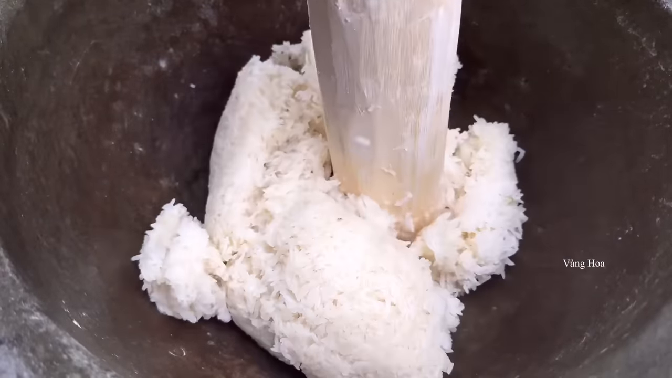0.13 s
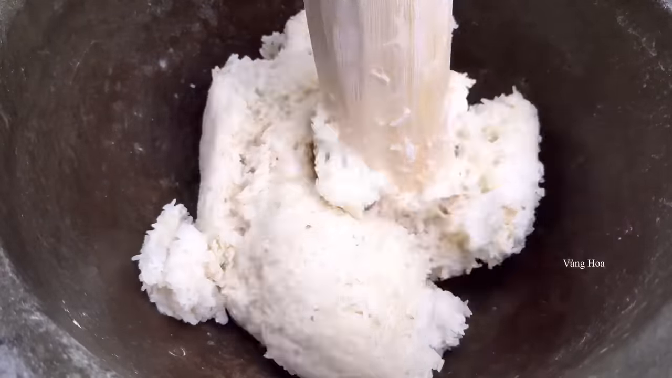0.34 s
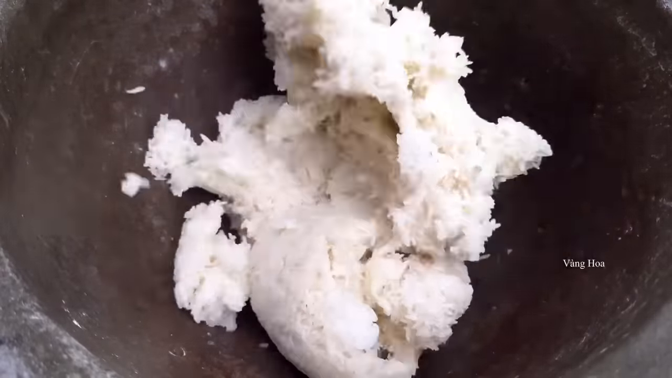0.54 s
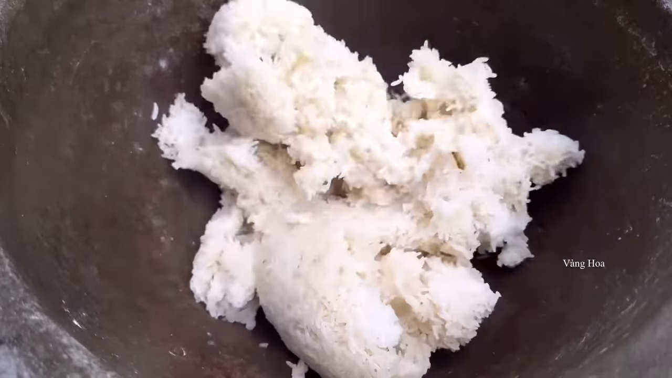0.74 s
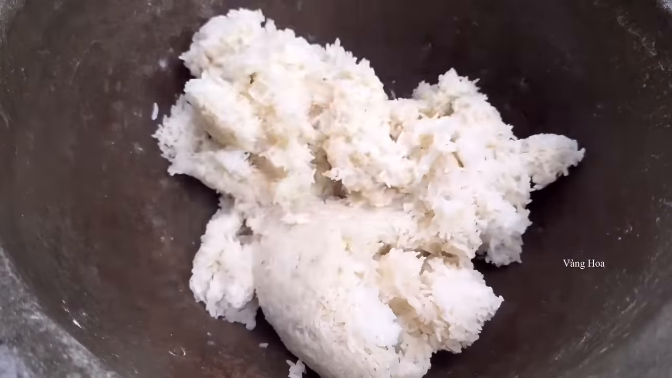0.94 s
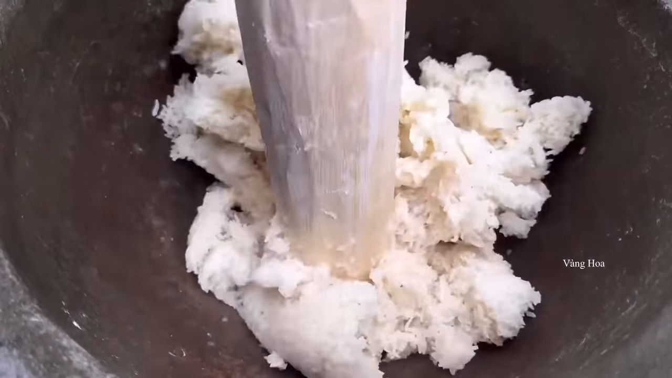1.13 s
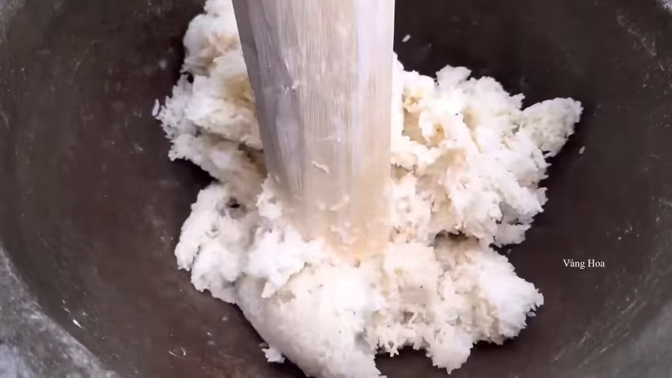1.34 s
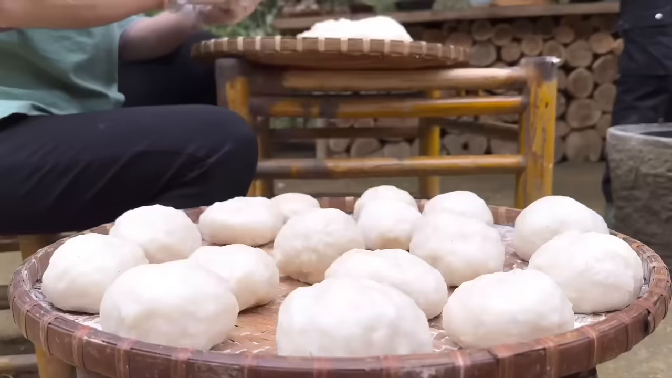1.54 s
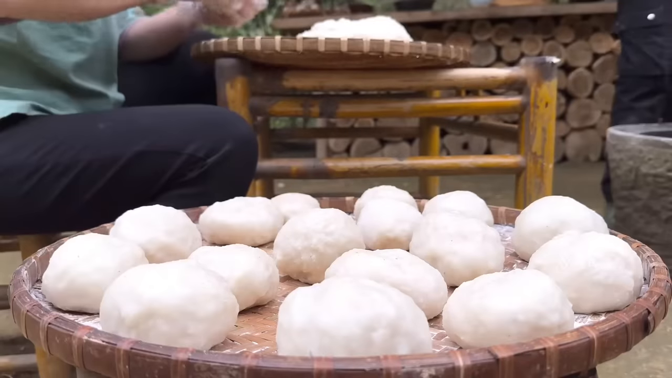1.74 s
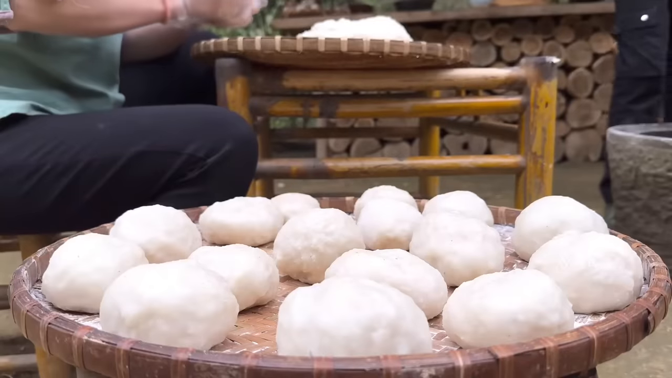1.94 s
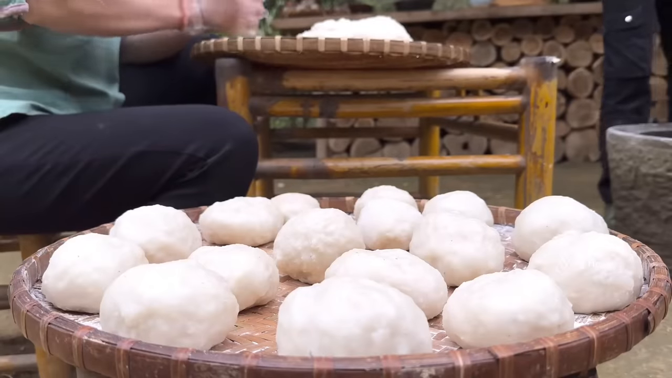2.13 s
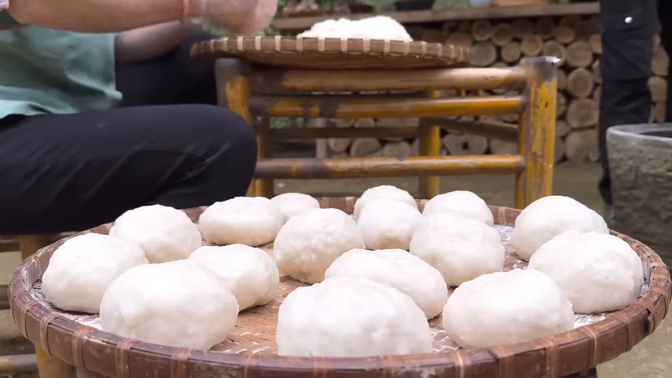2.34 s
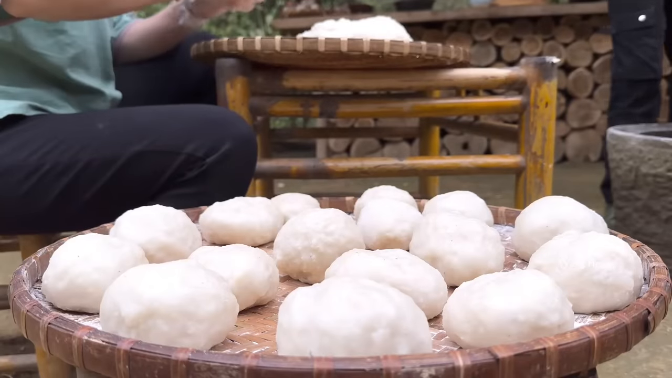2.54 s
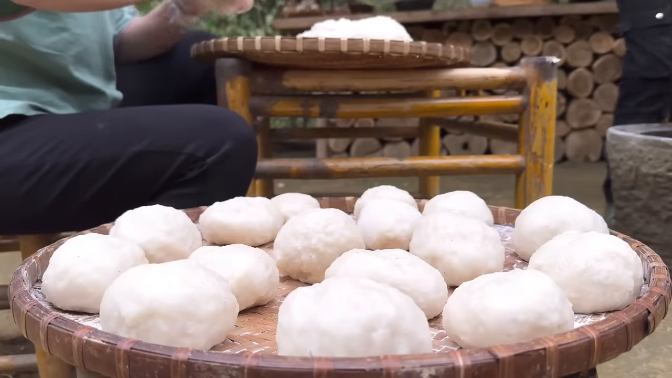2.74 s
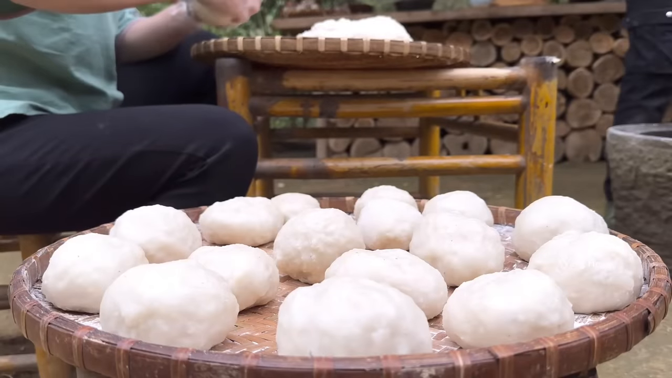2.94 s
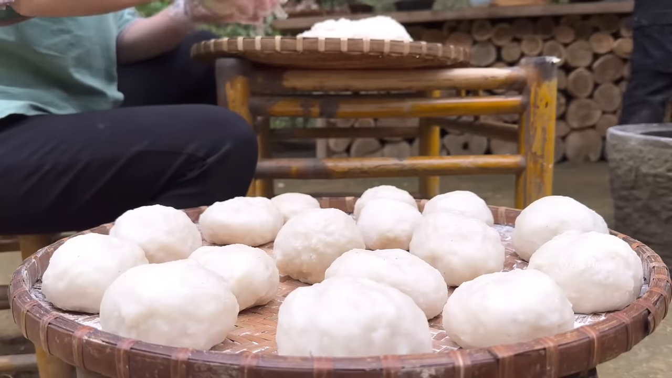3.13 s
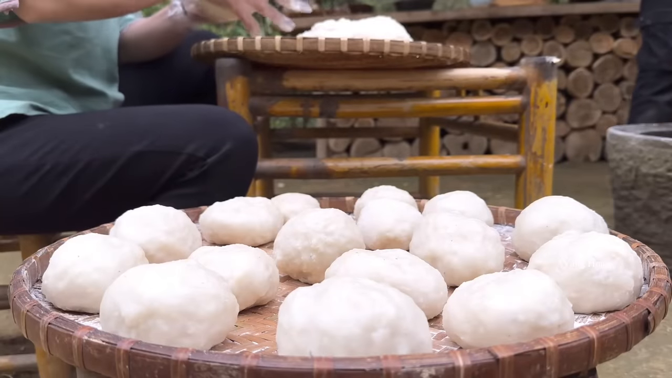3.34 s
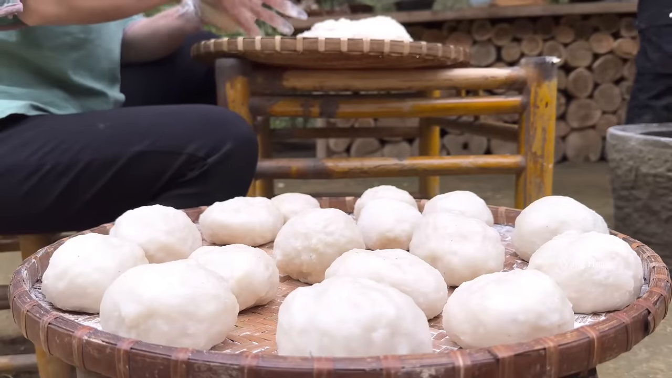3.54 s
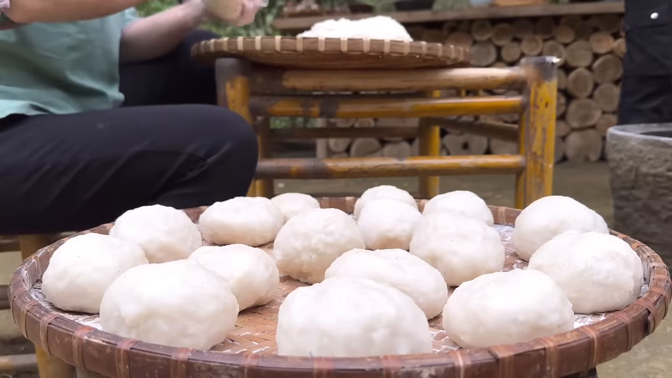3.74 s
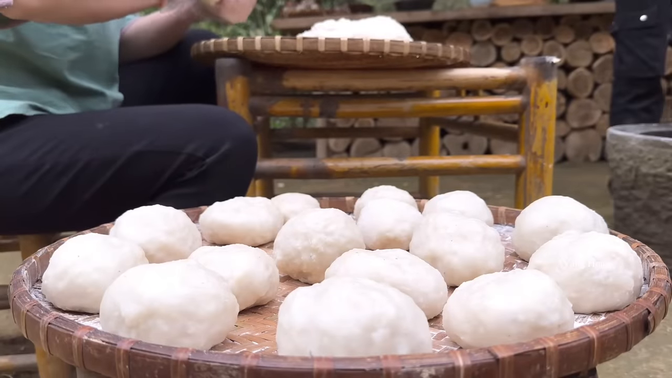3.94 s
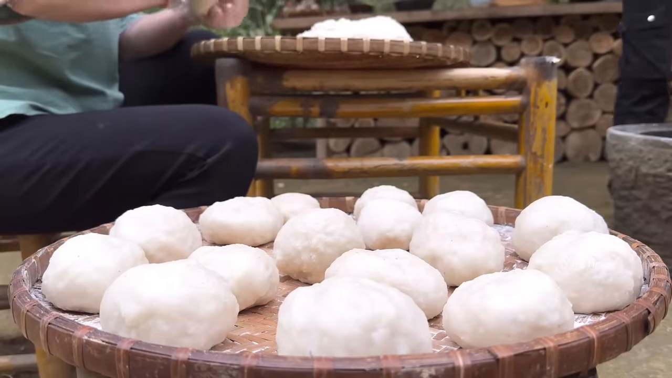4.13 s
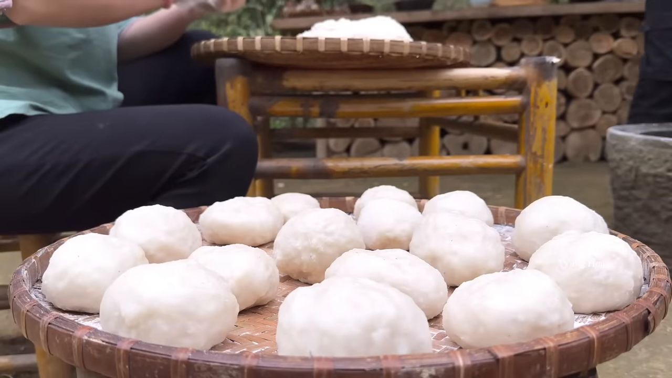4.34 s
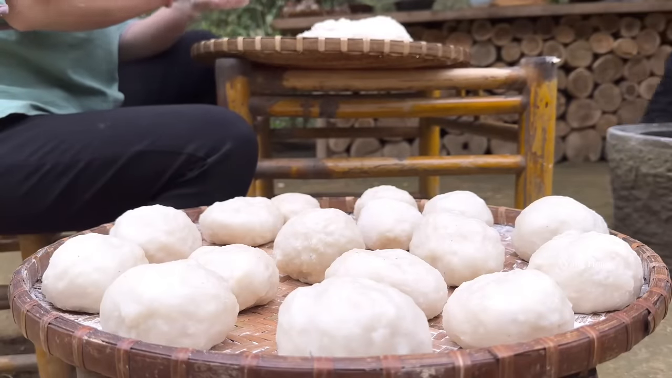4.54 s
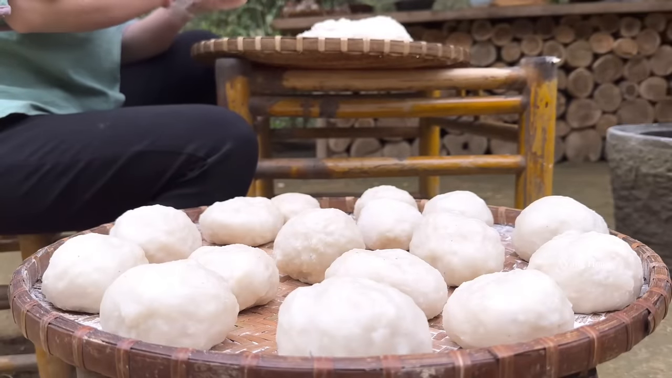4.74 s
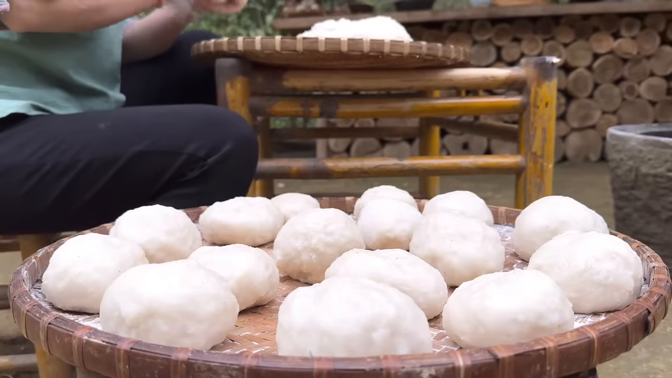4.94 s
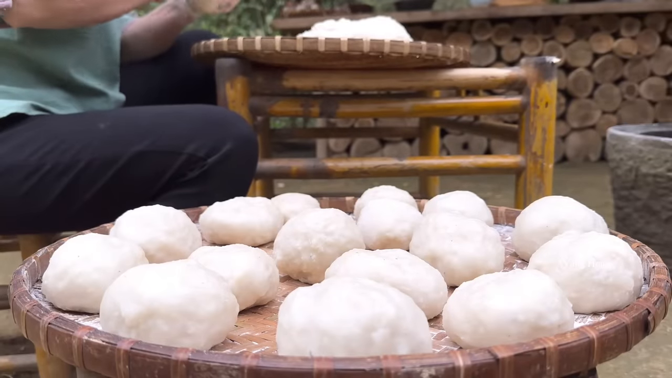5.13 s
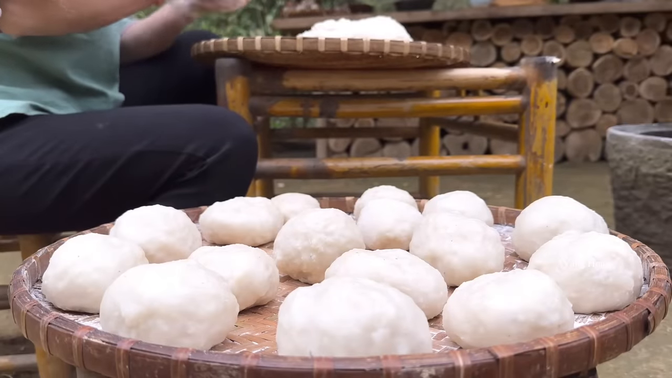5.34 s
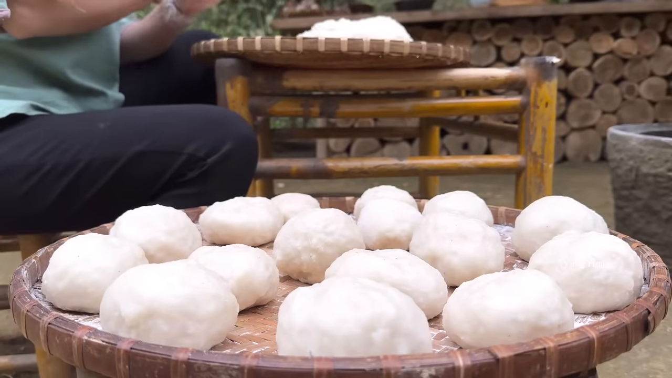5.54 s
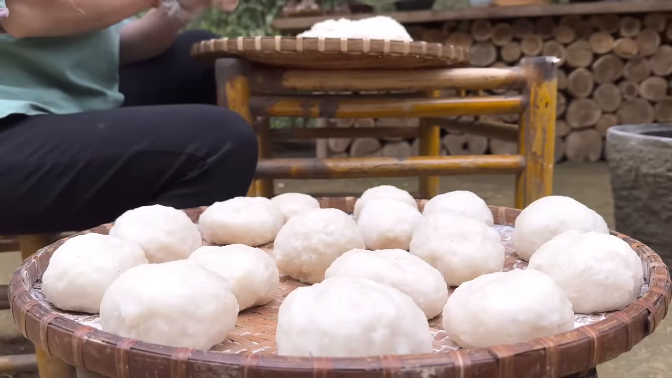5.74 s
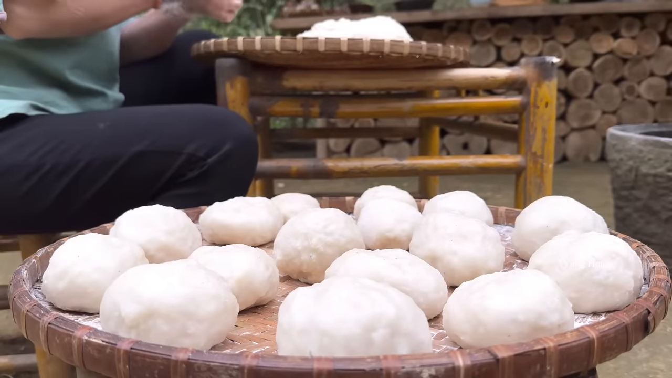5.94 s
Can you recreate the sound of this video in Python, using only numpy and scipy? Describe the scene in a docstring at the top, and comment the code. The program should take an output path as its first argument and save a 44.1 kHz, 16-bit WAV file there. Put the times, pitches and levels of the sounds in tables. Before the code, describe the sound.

Five moist thumps of a wooden pestle on steamed rice in a stone mortar, with sticky crackles and faint outdoor hiss.

```python
"""Open shelter outdoors: a heavy wooden pestle pounds steamed rice in a stone mortar, five blows. Each blow
squeezes air out with a splat, crushes down to the stone and rings mortar, pestle and ground. Between blows the
sticky mass smacks, pops and tears, and hands and clothes rustle over a faint hiss. Two blows are heard at the
rim; then, after a brief dip to silence, the scene changes and three are heard from aside."""
import sys
import numpy as np
from scipy import signal
from scipy.fft import rfft, irfft
from scipy.io import wavfile

SR = 44100
rng = np.random.default_rng(int(sys.argv[2]) if len(sys.argv) > 2 else 0)


def inscribe(sig):
    """Save sig as 16-bit PCM at rate SR to the path in sys.argv[1].

    A 1-D sig is mono; a 2-D sig holds one channel per row.
    Samples are clipped to [-1, 1] before scaling.
    """
    pcm = np.round(np.clip(np.atleast_2d(sig).T, -1, 1) * 32767)
    wavfile.write(sys.argv[1], SR, pcm.astype(np.int16))


N = 263277
SCENE_CHANGE_S = 1.549   # the scene changes from the rim to aside

# Pestle blows: start_s, crush_s, splat_rise_s, splat_db, crush_db, impact_db, knock_hz, knock_db,
# bass_db, bowl_db, ring_tilt_db_per_oct, rumble_db, rumble_t60_s, t60_share, splat_tail_db, pan_db,
# knock_cycles, low_mode_lag_s
BLOWS = [(0.0, 0.029, 0.0084, -15, -8.5, -14.5, 286.3, 21, -2, -3.5, -5, -59, 11, 0.27, -26, 4.7, 8.4, 0.00046),
         (1.034, 0.029, 0.016, -14.5, -14, -18.5, 300, 12, 2, 3.5, -2, -49, 6.5, 0.11, -16, 4.5, 9, 0.00068),
         (2.0511, 0.015, 0.0035, -19, -8, -9, 323, 17.5, -11, -6.5, -6, -44, 0.65, 0.67, -12.5, 2, 7.4, 0.00614),
         (3.7362, 0.00097, 0.0032, -21.5, -14, -18, 625, 28.5, -5, 5, 4.5, -42.5, 1.19, 0.71, 2, 2.5, 7.2, 0.0112),
         (5.4853, 0.01, 0.0075, -20, -14.5, -20, 278, 22, 2, -2.5, 4, -60, 1.4, 0.83, -6, 2.5, 10.3, 0.00766)]
# Air squeezed from rice: freq_hz, density_db
SPLAT_SPECTRUM = [(180, -45.5), (300, -12.5), (420, 2), (1000, -5.5), (2030, -8.5), (2650, -8.5),
                  (5000, -16), (8500, -14.5), (10000, -21.5), (13000, -27.5), (15500, -18)]


def from_db(db):
    return 10 ** (np.asarray(db) / 20)


def unit_rms(x):
    return x / np.sqrt(np.mean(x ** 2) + 1e-20)


def in_time(rows):
    """Rows of (time_s, values...) interpolated to every sample."""
    time_s, *columns = np.transpose(rows)
    return [np.interp(np.arange(N) / SR, time_s, column) for column in columns]


def at_hz(rows, hz, column=1):
    rows = np.array(rows)
    return np.interp(np.log(hz + 1), np.log(rows[:, 0] + 1), rows[:, column])


def coloured(spectrum, source, tilt_db_per_oct=0):
    """White source shaped to a spectrum, tilted about 1 kHz; unit rms."""
    hz = np.fft.rfftfreq(source.shape[-1], 1 / SR)
    gain = from_db(at_hz(spectrum, hz) + tilt_db_per_oct * np.log2((hz + 1) / 1000))
    return unit_rms(irfft(rfft(source) * gain, source.shape[-1]))


def drift(corner_hz):
    """Low-passed noise, unit rms."""
    step = 40
    r = np.exp(-2 * np.pi * corner_hz * step / SR)
    slow = signal.lfilter([1], [1, -2 * r, r * r], rng.standard_normal(N // step + 2002))[2000:]
    return np.interp(np.arange(N) / step, np.arange(len(slow)), unit_rms(slow))


def ring(force, hz, t60_s):
    """Damped mode: unit amplitude for a unit impulse, no DC."""
    r, w = from_db(-60 / (t60_s * SR)), 2 * np.pi * hz / SR
    return signal.lfilter([.5, 0, -.5], [1, -2 * r * np.cos(w), r * r], force + 1e-18)


def add(track, sound, start_s, pan_db, lag_ms=.1, aside=.5):
    """Mix in through two microphone ports; pan_db and lag_ms are left against right, aside is 0-1."""
    # Port response from aside: freq_hz, right_lead_rad, pan_db
    ports = [(59.36, 0.18, 1.5), (260, 0.67, -3), (740, 2.17, -2.5), (1460, 0.21, -18), (5290, 0.13, -3),
             (14520, .1, -16.5)]
    size, lead_in = len(sound), 64
    hz = np.fft.rfftfreq(size, 1 / SR)
    phase_rad = 2 * np.pi * hz * lag_ms / 1000 + aside * at_hz(ports, hz)
    left = from_db((pan_db + aside * at_hz(ports, hz, column=2)) / 2) / np.exp(.5j * phase_rad)
    pair = irfft(rfft(np.roll(sound, lead_in)) * [left, 1 / left], size)
    at = round(start_s * SR) - lead_in
    track[:, max(at, 0):at + size] += pair[:, max(-at, 0):N - at]


def mortar_modes(impact, crush, place, bass_db, bowl_db, tilt_db_per_oct, t60_share, lag_s):
    """Mortar, pestle and ground ring, damped by the rice; returns left- and right-leaning mode sums."""
    # Modes: freq_hz, level_db, free_t60_s
    modes = [(47.1, -5, 0.29), (75, -16.5, 0.19), (115.3, -9.5, 0.32), (160.6, -14.5, 0.21),
             (235, -7, 0.051), (244, 3, 0.045), (287, -7, 0.37), (319, -3, 0.25), (455, -1, 0.15),
             (549, -6, 0.2), (639, -10.5, 0.36), (675, -1, 0.17), (788, 4, 0.033), (849, -1, 0.07),
             (1288, -19.5, 0.089), (1500, -11.5, 0.082)]
    # Ring colour by place: freq_hz, rim_db, aside_db
    colour = [(44.7, 6, -3), (114, 5.5, 3.5), (300, 6, -3), (660.5, -12.5, 7), (1380, -16, -13)]
    spread_db, detune, wobble_db = 1.5, .007, 2.8
    out, t, lag = np.zeros((2, SR)), np.arange(SR) / SR, round(lag_s * SR)
    ground_force = (-1) ** place * from_db(11.5 + bass_db) * np.roll(impact, lag)   # inverted from aside
    scatter = rng.standard_normal((len(modes), 2))   # no two blows land alike
    wobble = rng.standard_normal((len(modes), 31))
    for k, (hz, level_db, free_t60_s) in enumerate(modes):
        level_db += at_hz(colour, hz, column=1 + place) + spread_db * scatter[k, 0]
        if hz < 150:
            force = ground_force
        else:
            is_bowl = hz < 350
            force = np.roll(impact + crush, lag * is_bowl)
            level_db += bowl_db * is_bowl + tilt_db_per_oct * np.log2(hz / 450)
            level_db += wobble_db * np.interp(t, np.linspace(0, 1, 31), wobble[k])
        tone = ring(force, hz * (1 + detune * scatter[k, 1]), free_t60_s * t60_share)
        out[1 - k % 2] += (-1) ** (k // 2) * from_db(level_db) * tone
    return out


def blows():
    """Splat of squeezed air, ragged crush, then wood hits stone; crush and impact drive the modes."""
    # Rim, then aside: splat_tilt_db_per_oct, left_lag_ms, aside_share
    places = [(1, 0.001, 0), (-2.5, 0.14, 0.87)]
    touch_db, touch_s = -6, .0035   # first contact with the rice
    settle_db, settle_s = -28.5, .049   # rice shifting on the stone
    out, t = np.zeros((2, N)), np.arange(SR) / SR
    for (start_s, crush_s, rise_s, splat_db, crush_db, impact_db, knock_hz, knock_db, bass_db, bowl_db,
         ring_tilt, _, _, t60_share, tail_db, pan_db, knock_cycles, lag_s) in BLOWS:
        place = int(start_s > SCENE_CHANGE_S)
        splat_tilt, lag_ms, aside = places[place]
        after_s = np.maximum(t - crush_s, 0)

        touch = from_db(touch_db) * t / touch_s * np.exp(1 - t / touch_s)
        airflow = np.minimum(touch + (t / rise_s) ** 8.3, 1) * np.exp(-np.maximum(t - rise_s, 0) / .028)
        splat_decay = np.exp(-after_s / .0057) + from_db(tail_db) * np.exp(-after_s / .65)
        for direction in (pan_db, lag_ms, aside), (0, -.22, 0):   # air leaves all round the pestle
            air = coloured(SPLAT_SPECTRUM, rng.standard_normal(SR), splat_tilt)
            add(out, from_db(splat_db) * airflow * splat_decay * air, start_s, *direction)

        impact = np.exp(-.5 * ((t - crush_s) / .0003) ** 2)
        impact *= from_db(impact_db) / impact.sum()
        load = from_db(crush_db) * np.minimum(t / crush_s, 1) ** .38
        release = np.exp(-after_s / .0076) + from_db(settle_db) * np.exp(-after_s / settle_s)
        crush = load * release * rng.standard_normal(SR) / np.sqrt(SR / 100)

        knock = from_db(knock_db) * ring(impact, knock_hz, knock_cycles / knock_hz)   # pestle head
        left, right = mortar_modes(impact, crush, place, bass_db, bowl_db, ring_tilt, t60_share, lag_s)
        add(out, knock + left, start_s, pan_db + 4.5, lag_ms, aside)
        add(out, right, start_s, pan_db - 4.5, lag_ms, aside)
    return out


def shelter(sound, t60_s=.25):
    """Roof and wood pile scatter a short dull tail, different on each side."""
    t = np.arange(SR // 2) / SR
    tail = rng.standard_normal((2, len(t))) * from_db(-60 * t / t60_s) * (t > .004)
    tail = signal.lfilter([1], [1, -.5], tail)
    return signal.fftconvolve(sound, tail / np.sqrt(np.sum(tail ** 2) / 2), axes=1)[:, :N]


def rumble_level_db():
    """Decaying rumble after each blow; silent from the scene change to the next blow."""
    t, level_db = np.arange(N) / SR, np.full(N, -120.)
    for blow in BLOWS:
        start_s, start_db, t60_s = blow[0], blow[11], blow[12]
        level_db = np.where(t >= start_s, start_db - 60 * (t - start_s) / t60_s, level_db)
    return np.where((t > SCENE_CHANGE_S) & (t < BLOWS[2][0]), -120, level_db)


def hiss_and_rumble():
    """Outdoor hiss and the blows' rumble: half-octave noise bands with one shared flicker."""
    # Outdoor air: freq_hz, density_db
    air_spectrum = [(15, -49), (25, -17), (58, -1), (146, -6), (766, 1), (1150, 0), (2150, 0), (3060, -3.5),
                    (9330, 1), (12900, -12.5), (15700, 1.5), (16200, -42)]
    # Left-right likeness: freq_hz, correlation
    likeness = [(60, 0.85), (180, 0.71), (550, -0.55), (1650, -0.053), (4970, -0.16), (15000, 0.34)]
    # Hiss level, three consecutive spans: time_s, level_db
    hiss_spans = [
        [(0.0, -59.5), (0.332, -51.5), (0.616, -58), (0.794, -59), (1.328, -52), (1.476, -58), (1.55, -73)],
        [(1.56, -57.5), (1.7, -53.5), (1.89, -51), (2.39, -61.5), (2.72, -58), (3.1, -55.5), (3.7, -55)],
        [(3.75, -55), (4.11, -57), (4.51, -55), (4.78, -57.5), (5.36, -54), (5.6, -59), (5.97, -56)],
    ]
    # Six ranges, bass to treble: hiss_db, swing_factor, rumble_db
    ranges = [(-8.5, 1.1, 2.5), (-2, 1.3, -4.5), (0, 1.3, -7.5), (0.5, 1.5, -29), (-2, 1.4, -21.5),
              (-6, 0.9, -23)]
    # Splits between ranges: freq_hz
    splits_hz = [200, 900, 3600, 7000, 12000]
    edges_hz = 25 * 2 ** np.arange(0, 9.6, .5)
    flicker = from_db(1.5 * drift(90))
    noise = coloured(air_spectrum, rng.standard_normal((2, 2, N)))
    groups = np.zeros((len(ranges), 2, N))
    for k, band_hz in enumerate(zip(edges_hz, edges_hz[1:])):
        mid, side = signal.sosfilt(signal.butter(2, band_hz, "band", fs=SR, output="sos"), noise[k % 2])
        centre_hz = np.sqrt(np.prod(band_hz))
        correlation = at_hz(likeness, centre_hz)
        pair = np.sqrt(1 + correlation) * mid + np.sqrt(1 - correlation) * side * [[1], [-1]]
        groups[np.searchsorted(splits_hz, centre_hz)] += flicker * pair
    hiss_db, = in_time(np.concatenate(hiss_spans))
    mean_db, rumble_db = hiss_db.mean(), rumble_level_db()
    out = np.zeros((2, N))
    for (hiss_trim_db, swing, rumble_trim_db), group in zip(ranges, groups):
        hiss = from_db(mean_db + hiss_trim_db + swing * (hiss_db - mean_db))
        out += np.hypot(hiss, from_db(rumble_db + rumble_trim_db)) * unit_rms(group)
    return out


def swishes(skirt_db=-15):
    """Rice tears, hands and cloth brush: swells of grainy noise through a broad resonance."""
    # Strokes: start_s, length_s, level_db, centre_hz, width_oct, grain_db, pan_db, treble_end_db
    strokes = [(0.247, 0.046, -53.5, 3570, 0.55, 5, 16, -35), (0.176, 0.37, -52.5, 368, 0.46, -2, 4, -43),
               (1.124, 0.6, -51, 235, 1.1, 1, 5, -38.5), (0.316, 0.17, -58, 1490, 1.3, -2, 15.5, -1),
               (0.783, 0.062, -62, 910, 1.8, 5.5, 24, -24), (1.29, 0.04, -43, 2800, 0.43, 3.5, 14, -44),
               (1.371, 0.14, -47.5, 2880, 6.6, 6, 6.5, -10), (1.701, 0.086, -48.5, 6000, 21, 9.5, 6.5, -13),
               (1.835, 0.3, -49.5, 7950, 6.6, 2.5, 8, -6), (2.24, 0.2, -50, 1720, 1.48, 3.5, 8.5, -15),
               (2.739, 0.13, -55, 318, 1.06, -1, 2, -25), (2.918, 0.36, -50.5, 1910, 2.6, 1, 6, -4),
               (4.304, 0.11, -46, 1630, 0.31, 1.5, 9, -23), (4.344, 0.31, -54, 504, 1.45, 4, 5.5, -10),
               (4.904, 0.3, -56, 400, 0.91, 3.5, 11, -8.5), (5.04, 0.15, -57, 2190, 0.23, 9, 9, -16),
               (5.299, 0.097, -44.5, 1610, 0.44, 3, 10.5, -17)]
    out = np.zeros((2, N))
    for start_s, length_s, level_db, hz, width_oct, grain_db, pan_db, treble_end_db in strokes:
        size = 2 * round(length_s * SR / 2) + 256
        spectrum = [(hz * 2 ** (step * width_oct), max(-6 * step ** 2, skirt_db))
                    for step in (-2, -1, -.5, 0, .5, 1, 2)]
        spectrum.append((max(16000, 4 * hz * 4 ** width_oct), treble_end_db))
        clumps = np.interp(np.arange(size), np.arange(0, size, 400), rng.standard_normal(size)[::400])
        grains = np.repeat(np.minimum(rng.exponential(1, size), 3)[::30], 30)[:size]   # 0.7 ms each
        swell = np.hanning(size) ** .8 * from_db(grain_db * grains + 2.3 * clumps)
        for lag_ms in .12, -.3:   # independent halves for width
            swish = coloured(spectrum, swell * rng.standard_normal(size))
            add(out, from_db(level_db) * swish, start_s, pan_db, lag_ms)
    return out


def grain_ticks():
    """Single grains snap: about a millisecond of band noise each."""
    # Snaps: start_s, peak_db, centre_hz, pan_db
    snaps = [(0.2159, -30, 2000, 11), (0.414, -23, 2420, -8), (0.4224, -22, 2100, 14),
             (0.6674, -37, 9360, 10), (0.792, -36, 9600, 4), (0.904, -35, 3120, 32),
             (1.3953, -29, 7000, 15), (1.4005, -20, 8400, 16.5), (2.185, -47.5, 2573, 7),
             (3.681, -39, 6600, -20.5), (4.659, -32, 6300, 10.5), (5.136, -32, 9500, 0)]
    out, t = np.zeros((2, N)), np.arange(2048) / SR
    for start_s, peak_db, hz, pan_db in snaps:
        spectrum = [(hz / 4, -24), (hz / 2, -4), (hz, 0), (hz * 1.9, -4), (hz * 3, -10)]
        snap = coloured(spectrum, rng.standard_normal(len(t))) * t * np.exp(-t / .00045)
        add(out, from_db(peak_db) * snap / np.abs(snap).max(), start_s, pan_db)
    return out


def pull_smacks():
    """Suction lets go; a short ragged force rings the pestle."""
    # Releases: start_s, peak_db, tilt_db_per_oct
    releases = [(0.231, -17.5, 14), (1.2817, -18, 13)]
    # Pestle modes: freq_hz, level_db, t60_s
    modes = [(415, 13.5, 0.089), (702, -0.5, 0.11), (880, 12.5, 0.035), (1190, 7.5, 0.016),
             (1354, 7.5, 0.031), (1730, 6.5, 0.0092)]
    out, t = np.zeros((2, N)), np.arange(SR // 4) / SR
    for start_s, peak_db, tilt in releases:
        pulse = np.exp(-.5 * ((t - .001) / .00017) ** 2)
        ragged = signal.lfilter([.4], [1, -.7], rng.standard_normal(len(t))) * np.exp(-t / .014)
        force = pulse + .3 * ragged
        tone = sum(from_db(db + tilt * np.log2(hz / 900)) * ring(force, hz, t60_s)
                   for hz, db, t60_s in modes)
        add(out, from_db(peak_db) * tone / np.abs(tone).max(), start_s, pan_db=12.5)
    return out


def peel_crackles(snaps_per_s=270, ring_cycles=4):
    """Sticky rice peels off the pestle in random snaps of uneven size and pitch."""
    out, size = np.zeros((2, N)), SR // 4
    pitches_hz = np.geomspace(1000, 14000, 10)
    for start_s, length_s, level_db in (.268, .04, -53), (.344, .1, -34.5), (1.29, .19, -42):
        time_draw, size_draw, pitch_draw = rng.random((3, size))
        fires = (time_draw < snaps_per_s / SR) * (np.arange(size) < length_s * SR)
        snaps = fires * from_db(-6 * np.log(size_draw + .057))
        pitch_index = (pitch_draw * len(pitches_hz)).astype(int)
        crackle = sum(ring(snaps * (pitch_index == k), hz, ring_cycles / hz)
                      for k, hz in enumerate(pitches_hz))
        add(out, from_db(level_db) * crackle, start_s, pan_db=6)
    return out


def pops():
    """Pops and knocks between blows: a one-cycle push rings three partials under a crack of noise."""
    # Pops: start_s, tone_peak_db, pitch_hz, pan_db, crack_re_peak_db
    events = [(0.345, -36, 339, 1, 2.5), (0.55, -36.5, 488, 3, -36), (0.792, -46, 269, 3, -1),
              (2.329, -37.5, 2330, 4, -11), (2.361, -39, 2460, 8.5, -9), (2.676, -45.5, 853, -5, -12.5),
              (2.915, -19.5, 541, 2.5, -18.5), (4.442, -35.5, 345, 7, -8.5), (4.541, -33, 436, 1, -1)]
    # Partials: pitch_ratio, level_db
    partials = [(0.96, 8.5), (0.26, -23.5), (0.58, -13)]
    out, t = np.zeros((2, N)), np.arange(SR // 4) / SR
    for start_s, peak_db, hz, pan_db, crack_db in events:
        t60_s = .08 * (500 / hz) ** .14
        push = np.exp(-.5 * ((t * hz - .8) / .22) ** 2)
        tone = sum(from_db(db) * ring(push, hz * ratio, t60_s / ratio ** .5) for ratio, db in partials)
        noise = coloured(SPLAT_SPECTRUM, rng.standard_normal(len(t)), tilt_db_per_oct=-3.5)
        crack = from_db(crack_db) * noise * t / .001 * np.exp(-t / .0024)
        add(out, from_db(peak_db) * (tone / np.abs(tone).max() + crack), start_s, pan_db)
    return out


def pull_hum():
    """Hollow rising tone of wavering level as the pestle pulls free."""
    # Glide: time_s, pitch_hz, level_db
    glide = [(1.199, 203.4, -63), (1.291, 217.4, -42.5), (1.52, 234.7, -53.5)]
    (first_s, first_hz, _), *_, (last_s, last_hz, _) = glide
    hz, level_db = in_time([(first_s - .04, first_hz, -90), *glide, (last_s + .013, last_hz, -90)])
    return np.sqrt(2) * from_db(level_db + 2 * drift(25)) * np.sin(2 * np.pi * np.cumsum(hz) / SR)


def flutter(start_s=3.85, length_s=.39, beats_per_s=40, level_db=-54.5):
    """Low flutter after the fourth blow: even beats through two resonances."""
    t = np.arange(N) / SR
    beats = np.diff(np.floor(np.arange(N) * beats_per_s / SR), prepend=0)
    swell = np.interp((t - start_s) / length_s, [0, .25, .85, 1], [0, 1, 1, 0])
    tone = ring(beats, hz=177, t60_s=.15) + .39 * ring(beats, hz=76, t60_s=.14)
    return from_db(level_db) * swell * unit_rms(tone)


def far_chirps(pitch_hz=1160):
    """Three faint far-off tones, perhaps a bird: one sine under smooth swells."""
    t, swell = np.arange(N) / SR, np.zeros(N)
    for start_s, length_s, level_db in (4.89, .037, -59.5), (4.965, .055, -60.5), (5.224, .026, -55):
        swell += from_db(level_db) * np.sin(np.pi * np.clip((t - start_s) / length_s, 0, 1))
    return np.sqrt(2) * swell * np.sin(2 * np.pi * pitch_hz * t)


def scene():
    """Mortar sounds and their tail over the background; all dips to silence where the scene changes."""
    mortar = blows() + pull_smacks() + pops() + grain_ticks() + peel_crackles()
    mix = mortar + from_db(-31.5) * shelter(mortar)
    mix += swishes() + hiss_and_rumble() + pull_hum() + far_chirps() + flutter()
    dip = np.interp(np.arange(N) / SR - SCENE_CHANGE_S, [-.003, 0, .02, .06, .15], [1, 0, .01, .25, 1])
    return mix * dip


def record(dry):
    """Low cut, treble gap near 11.5 kHz, soft clip, high cut."""
    low_cut = signal.butter(4, 37, "high", fs=SR, output="sos")
    treble_gap = signal.ellip(4, 1, 32, [10300, 12350], "bandstop", fs=SR, output="sos")
    high_cut = signal.cheby2(12, 70, 16600, fs=SR, output="sos")
    heard = signal.sosfilt(treble_gap, signal.sosfilt(low_cut, dry))
    return signal.sosfilt(high_cut, 1.1 * np.tanh(heard / 1.1))


dry = scene()
out = record(dry)
inscribe(out)
```